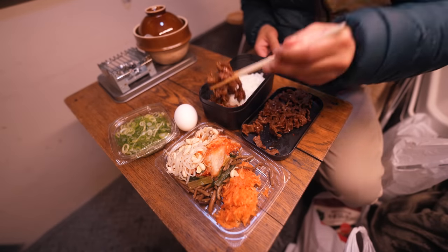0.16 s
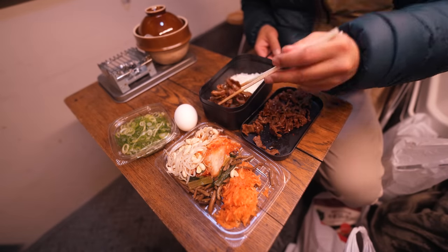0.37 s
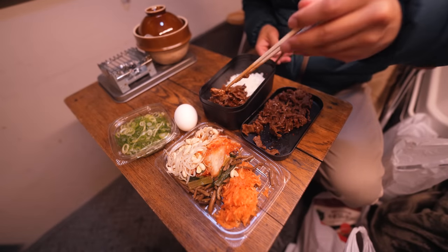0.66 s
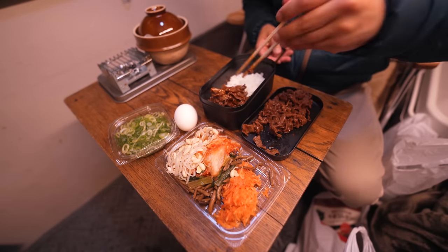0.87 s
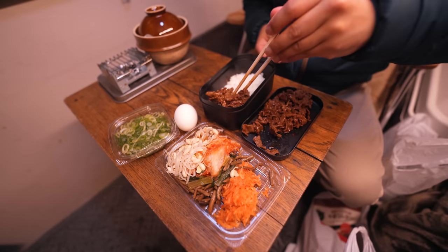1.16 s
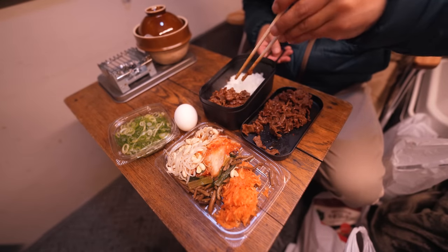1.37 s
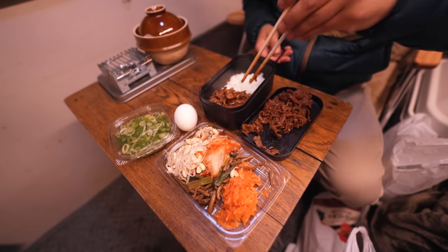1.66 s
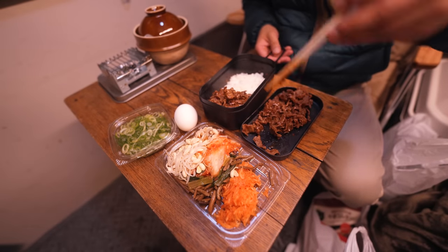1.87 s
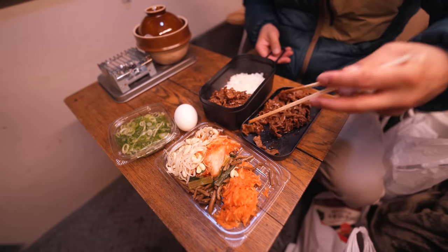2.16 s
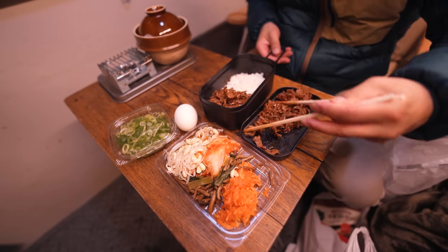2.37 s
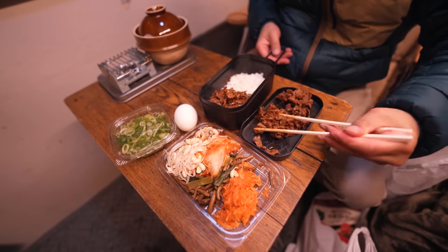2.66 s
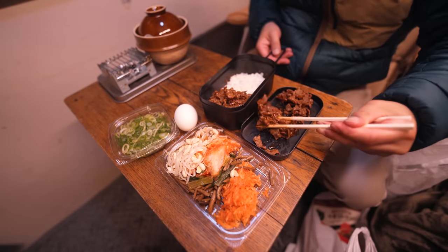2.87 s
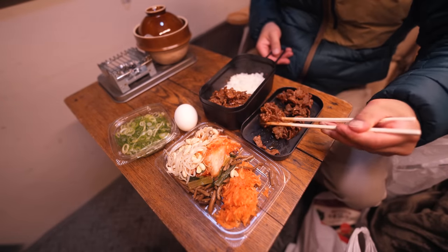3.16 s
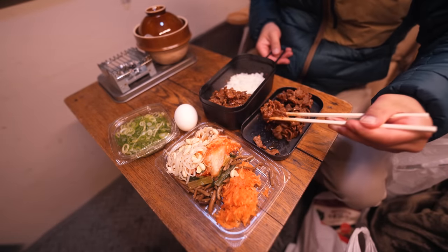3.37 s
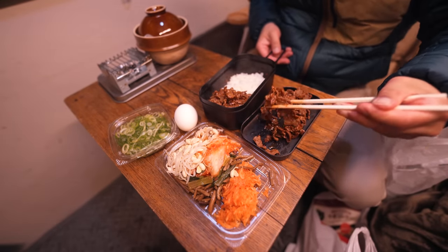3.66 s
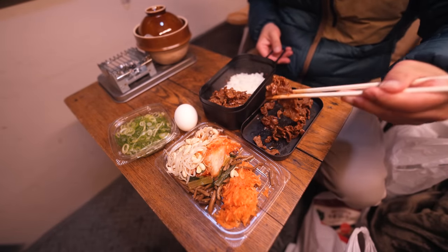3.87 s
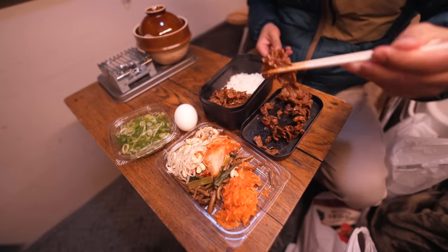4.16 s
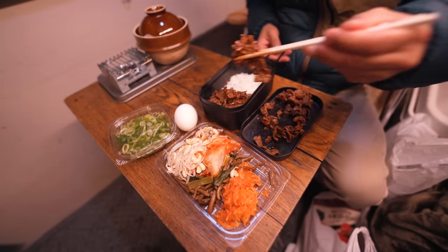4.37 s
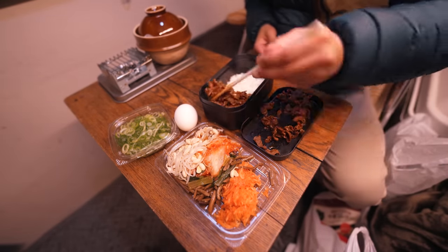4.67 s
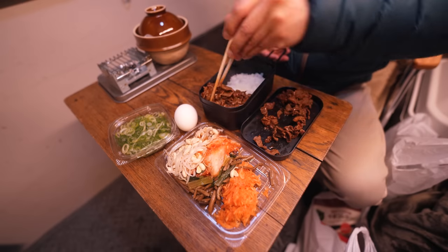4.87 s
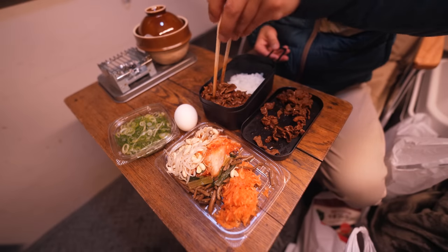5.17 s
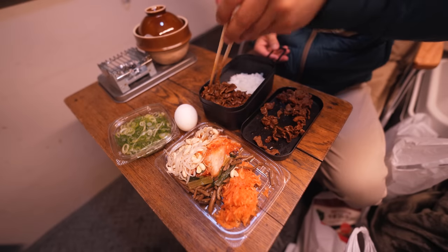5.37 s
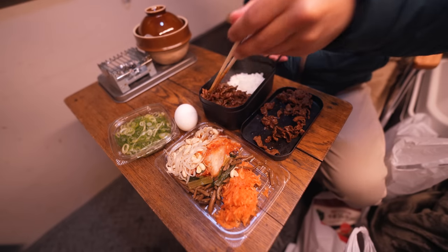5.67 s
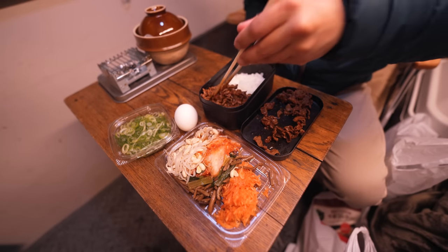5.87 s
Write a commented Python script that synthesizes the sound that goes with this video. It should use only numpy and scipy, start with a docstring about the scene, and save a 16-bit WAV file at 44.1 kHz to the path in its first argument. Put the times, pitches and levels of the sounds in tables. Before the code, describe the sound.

Close, quiet meal sounds: nylon sleeve swishes, chopstick clicks, a raspy tray scrape, tiny moist ticks and a hard crockery clunk in a small cabin.

```python
"""A faint hum and hiss in a quiet parked car, then small sounds of a meal at a wooden table.
A padded jacket shuffles and swishes (flickering friction noise); a plastic tray bumps and crockery knocks (struck modes).
Thin high ticks, most perhaps from moist food, one a loud hard snap, and chopstick clicks are cracks with brief rings;
chopsticks scrape the tray (noise through wavering resonances).
The small cabin adds dense reflections to the contacts and friction; the sound is mono."""
import sys
import numpy as np
from scipy import signal
from scipy.fft import rfft, irfft
from scipy.io import wavfile
from scipy.ndimage import uniform_filter1d

SR = 44100
rng = np.random.default_rng(int(sys.argv[2]) if len(sys.argv) > 2 else 0)


def inscribe(sig):
    """Save sig as 16-bit PCM at rate SR to the path in sys.argv[1].

    A 1-D sig is mono; a 2-D sig holds one channel per row.
    Samples are clipped to [-1, 1] before scaling.
    """
    pcm = np.round(np.clip(np.atleast_2d(sig).T, -1, 1) * 32767)
    wavfile.write(sys.argv[1], SR, pcm.astype(np.int16))


N = 265041
TIME = np.arange(N) / SR
RING_TIME = TIME[:SR // 4]   # a quarter second, for single contacts and echoes

# crockery blows, a first touch, the full blow and a faint rattle: start_s, level_db, contact_brightness_hz
KNOCKS = [(1.5850, -44, 7000), (1.5855, -21.5, 3200), (1.6055, -39.5, 5000), (1.6252, -50, 3000)]


def from_db(db):
    """Decibels to gain."""
    return 10 ** (np.asarray(db) / 20)


def rms_one(x):
    """Scale to unit power."""
    return x / np.sqrt(np.mean(x ** 2) + 1e-20)


def coloured(x, colour):
    """Shape the spectrum by (hz, db) points, straight in log frequency; unit power."""
    hz, db = np.transpose(colour)
    bins_hz = np.maximum(np.fft.rfftfreq(N, 1 / SR), 1)
    gain = from_db(np.interp(np.log(bins_hz), np.log(hz), db))
    return rms_one(irfft(rfft(x) * gain, N))


def cut(x, hz, kind, order=2):
    """Causal low- or high-pass."""
    return signal.sosfilt(signal.butter(order, min(hz, .45 * SR), kind, fs=SR, output="sos"), x)


def resonate(x, hz, width_hz):
    """One resonance, of gain 1 at its top."""
    return signal.lfilter(*signal.iirpeak(hz, hz / width_hz, fs=SR), x)


def drift(hz):
    """Random wander of unit power, slower than hz."""
    return rms_one(cut(rng.standard_normal(N), hz, "low"))


def add(track, start_s, sound):
    """Mix a sound into the track at a time."""
    start = min(round(start_s * SR), N - 1)
    track[start:start + len(sound)] += sound[:N - start]


def together(gains):
    """Overlapping movements add in power."""
    return np.sqrt(sum(gain ** 2 for gain in gains))


def swell(top_s, half_s):
    """A movement gathers speed and slows again: a rounded top with flanks straight in dB."""
    flank_db = 9.5   # final slope, per half-length
    return from_db(-flank_db * (np.hypot(1, (TIME - top_s) / half_s) - 1))


def stroke(start_s, length_s, attack_s, release_s, rise_db_per_s=0):
    """Attack, a hold that may grow to full level, release; attack and release times are per 20 dB."""
    early_s = np.maximum(start_s - TIME, 0)
    late_s = np.maximum(TIME - start_s - length_s, 0)
    to_go_s = np.clip(start_s + length_s - TIME, 0, length_s)
    return from_db(-20 * (early_s / attack_s + late_s / release_s) - rise_db_per_s * to_go_s)


def cabin(x, wet_db, low_hz=500, even_hz=800):
    """Direct sound plus dense reflections from table, windows and walls: a fine comb, even in overall colour."""
    cabin_t60_s = 0.17
    near_t60_s, near_db = 0.051, 15   # box walls and table top answer first and briefly
    t = RING_TIME
    fade = from_db(-60 * t / cabin_t60_s) + from_db(near_db - 60 * t / near_t60_s)
    echoes = rng.standard_normal(len(t)) * fade * (t > .0004)
    echoes = cut(echoes / np.linalg.norm(echoes), low_hz, "high")
    paths = rfft(signal.unit_impulse(len(t)) + from_db(wet_db) * echoes, SR)   # bins 1 Hz apart
    smooth_power = uniform_filter1d(np.abs(paths) ** 2, max(int(even_hz), 1))
    response = irfft(paths / np.sqrt(smooth_power), SR)[:len(t)]
    return np.hypot(1, from_db(wet_db)) * signal.fftconvolve(x, response)[:len(x)]


def ring(hz, t60_s):
    """A struck mode: a sine that dies exponentially."""
    return np.sin(2 * np.pi * hz * RING_TIME) * from_db(-60 * RING_TIME / t60_s)


def crack(low_hz, high_hz):
    """The brief broadband pulse of a contact, of height 1."""
    pulse = cut(signal.unit_impulse(SR // 4), low_hz, "high", order=4)
    pulse = cut(pulse, high_hz, "low", order=1)
    return pulse / np.abs(pulse).max()


def struck(blows, modes, wet_db, crack_db, crack_low_hz, crack_wet_db):
    """Every blow cracks and rings the same body; a softer contact has less treble."""
    body = sum((-1) ** k * from_db(db) * ring(hz, t60_s) for k, (hz, db, t60_s) in enumerate(modes))
    out = np.zeros(N)
    for start_s, level_db, contact_hz in blows:
        clack = from_db(crack_db) * cabin(crack(crack_low_hz, contact_hz), crack_wet_db)
        blow = cabin(body, wet_db, low_hz=1070) + clack
        add(out, start_s, from_db(level_db) * cut(blow, contact_hz, "low", order=1))
    return out


def snap(modes, cycles, crack_db, crack_low_hz, crack_high_hz, wet_db, crack_wet_db):
    """A small contact: a crack and a brief ring at its (hz, db) modes, down 60 dB after the given cycles."""
    tone = sum(from_db(db) * ring(hz, cycles / hz) for hz, db in modes)
    lowest_hz = min(hz for hz, db in modes)
    tone = cut(tone, 0.8 * lowest_hz, "high", order=4)   # small things radiate little bass
    edge = from_db(crack_db) * crack(crack_low_hz, crack_high_hz)
    return cabin(tone, wet_db) + cabin(edge, crack_wet_db)


def friction(colour, slips_per_s, flutter_db, wet_db, even_hz=600):
    """Surfaces catch and slip thousands of times a second, under a wavering pressure; unit power."""
    slips = rng.standard_normal(N) * (rng.random(N) < slips_per_s / SR)
    pressure = from_db(flutter_db * drift(41.7))
    return coloured(cabin(slips * pressure, wet_db, even_hz=even_hz), colour)


def hush():
    """Filtered noise: faint cabin hum and hiss, and a deep seat rumble that swells as weight shifts."""
    # weight shifts: top_s, level_db
    shifts = [(.34, -70), (2.42, -69.5), (3.04, -82), (4.84, -73), (5.33, -70), (5.991, -65)]
    # rumble spectrum: frequency_hz, density_db
    sway_colour = [(15, -8), (42, -6.5), (70, -12), (130, -10), (400, -49), (2000, -78)]
    # hum and hiss spectrum: frequency_hz, density_db
    hush_colour = [(12, -52.5), (20, -22), (104, -0.5), (163, -9), (204, -5), (241, -7), (285, -0.4),
                   (357, -6.5), (388, -3.5), (527, -6.5), (642, -10), (923, -16.5), (1220, -16),
                   (1610, -21), (7000, -20.5), (15000, -19.5)]
    shifting = together(from_db(db) * swell(top_s, half_s=0.11) for top_s, db in shifts)
    sway = shifting * coloured(rng.standard_normal(N), sway_colour)
    return sway + from_db(-62) * coloured(rng.standard_normal(N), hush_colour)


def jacket():
    """Each reach shuffles the padding and slides the nylon; where the sleeve brushes, it hisses and zips."""
    # arm movements: top_speed_s, half_length_s, padding_db, nylon_db
    reaches = [(0.193, 0.12, -60, -60.5), (0.588, 0.11, -65, -65), (0.97, 0.068, -67, -69),
               (1.763, 0.18, -65.5, -66), (2.142, 0.1, -57.5, -59), (2.41, 0.1, -56, -64.5),
               (2.912, 0.17, -59.5, -69), (3.23, 0.077, -87, -87), (4.62, 0.17, -61.5, -61.5),
               (5.035, .14, -56.5, -48.5), (5.303, 0.088, -57.5, -62.5), (5.583, 0.22, -67, -67),
               (5.985, 0.065, -63.5, -69)]
    # sleeve against jacket: start_s, length_s, hiss_db, weave_zip_db
    swishes = [(2.349, 0.017, -51, -74), (2.464, 0.09, -46, -45), (2.595, 0.042, -49, -71),
               (2.675, 0.079, -57.5, -73), (2.917, 0.025, -51.5, -54), (4.834, 0.11, -57, -44.5),
               (4.994, 0.19, -66, -47.5)]
    # nylon spectrum: frequency_hz, density_db
    slide_colour = [(150, -34.5), (400, -2.5), (1000, -5), (2000, -2.5), (4000, -2.5), (7000, -2.5),
                    (10000, -3.5), (14000, -4.5), (16000, -4.5)]
    # weave spectrum: frequency_hz, density_db
    zip_colour = [(1000, -46), (9000, -15), (11500, -9), (13300, -6), (15500, -3.5)]
    # padding spectrum: frequency_hz, density_db
    shuffle_colour = [(100, -15), (350, 7), (600, 2.5), (1000, 2.5), (1600, -2), (2500, -4), (4000, -9),
                      (8000, -37), (16000, -67.5)]
    padding, nylon, zipping = [], [], []
    for top_s, half_s, padding_db, nylon_db in reaches:
        speed = swell(top_s, half_s)
        padding.append(from_db(padding_db) * speed)
        nylon.append(from_db(nylon_db) * speed)
    for start_s, length_s, hiss_db, zip_db in swishes:
        release_s = 0.033 + 0.43 * length_s   # a longer swish dies more slowly
        contact = stroke(start_s, length_s, 0.037, release_s)
        nylon.append(from_db(hiss_db) * contact)
        zipping.append(from_db(zip_db) * contact)
    slide = together(nylon) * friction(slide_colour, slips_per_s=20000, flutter_db=0.6, wet_db=-9.5)
    weave = together(zipping) * coloured(rng.standard_normal(N), zip_colour)
    shuffle = together(padding) * friction(shuffle_colour, slips_per_s=2500, flutter_db=1.0, wet_db=-3.0)
    return slide + weave + shuffle


def tray():
    """The plastic tray bumps on the table: a crack and short modes, duller for softer contacts."""
    # bumps: start_s, level_db, contact_brightness_hz
    bumps = [(.114, -58, 2500), (.141, -59.5, 1500), (.916, -61, 1190), (.947, -58, 2000),
             (2.010, -57.5, 900), (2.043, -61.5, 3000), (2.420, -71, 2000), (2.843, -56, 1200),
             (2.9735, -50.5, 5000), (3.013, -57, 1000), (3.0622, -37.5, 1620), (3.0755, -47, 1200),
             (3.1915, -59, 1690), (3.238, -64, 990), (3.259, -64.5, 1400), (3.365, -66, 2000),
             (3.494, -65.5, 1500), (3.775, -60, 1210), (4.499, -59, 1500), (4.630, -58, 1200),
             (5.962, -61.5, 2500)]
    # tray modes: frequency_hz, level_db, t60_s
    tray_modes = [(128, -30, 0.39), (213, -18, 0.19), (377, -12, 0.12), (435, 4.5, 0.048),
                  (540, -0.5, 0.057), (730, -2, 0.036), (879, 0, 0.058), (973, -18, 0.084),
                  (1485, -13, 0.034), (2370, -2.5, 0.023), (3570, 1.5, 0.013), (4800, -5, 0.0086)]
    return struck(bumps, tray_modes, wet_db=3, crack_db=3.5, crack_low_hz=408, crack_wet_db=12.0)


def thin_ticks():
    """Thin, high ticks, most perhaps from moist food, and one loud, hard snap at 4.556 s: a crack and one mode."""
    # ticks: start_s, level_db, pitch_hz, ring_cycles, crack_db
    ticks = [ (.1382, -28.5, 11800, 22, -14), (.3028, -47, 14300, 40, -12), (0.4086, -37.5, 13500, 35, -7),
             (.426, -45, 14200, 38, -12), (0.6086, -50.5, 11000, 50, -14), (0.723, -49.5, 10200, 35, -4),
             (1.4437, -46.5, 13700, 28, -15), (3.5125, -46, 13200, 28, -12), (3.65, -42.5, 12000, 46, 5),
             (4.5556, -18, 14100, 43, -7), (4.5559, -31.5, 4540, 13, -30), (4.5558, -19, 8920, 22, -4.5),
             (5.348, -46, 10500, 15, -6), (5.5125, -46, 14000, 33, -21), (5.538, -49, 13500, 36, -16),
             (5.573, -44.5, 9500, 23, -1), (5.6008, -50.5, 8100, 40, 2), (5.627, -47, 13500, 34, -12),
             (5.702, -35, 14800, 60, -19), (5.8877, -46, 7200, 26, -14)]
    out = np.zeros(N)
    for start_s, level_db, hz, cycles, crack_db in ticks:
        # the higher the pitch, the higher the crack starts
        tick = snap([(hz, 0)], cycles, crack_db, crack_low_hz=0.29 * hz, crack_high_hz=14300,
                    wet_db=4.5, crack_wet_db=3.0)
        add(out, start_s, from_db(level_db) * tick)
    return out


def chopsticks():
    """Wooden tips click on box and tray: two modes whose pitch depends on the spot, with the same damping."""
    # clicks: start_s, level_db, pitch_hz, second_mode_hz, second_mode_db, crack_db, crack_low_hz
    clicks = [ (0.1383, -25, 3540, 5040, 2.5, -2.5, 1700), (0.141, -40.5, 1670, 6800, 15, 14.5, 790),
              (.343, -52, 4530, 3700, -15, -8, 3000), (0.948, -55, 1520, 3100, -9, 7, 800),
              (2.2980, -39.5, 2300, 4530, -5, 3, 1200), (2.3025, -34, 2310, 870, -10, -8, 1300),
              (2.3386, -33.5, 2330, 1780, -2.5, -5, 1200), (2.4107, -38.5, 915, 2110, 1, -0.5, 560),
              (2.4195, -41, 844, 713, 4, -18, 520), (2.9734, -45.5, 1490, 2000, 2, 11, 850),
              (3.0025, -40, 2600, 3270, -1, -8, 2000), (3.0622, -36, 2060, 4440, 3, -11, 2200),
              (3.1927, -55, 990, 2960, -7, -2, 700), (3.7516, -42, 1640, 3260, 3.5, -0.5, 1110),
              (5.7225, -45, 2310, 790, -4, -10, 1390), (5.9800, -37, 2220, 3500, -4, -11, 1490),
              (5.9831, -26.5, 1830, 2630, 2, -6, 1500), (5.9830, -29.5, 3650, 4800, 0, -10, 4500),
              (5.9832, -32.5, 6250, 7000, 0, -8, 5000)]
    out = np.zeros(N)
    for start_s, level_db, hz, second_hz, second_db, crack_db, low_hz in clicks:
        modes = [(hz, 0), (second_hz, second_db)]
        click = snap(modes, 20.3, crack_db, low_hz, crack_high_hz=4260, wet_db=-0.5, crack_wet_db=4.5)
        add(out, start_s, from_db(level_db) * click)
    return out


def crockery():
    """A hard knock rings the crockery's many modes, then fine chatter follows."""
    # crockery modes, the last three very short for the clack: frequency_hz, level_db, t60_s
    crockery_modes = [(208, -38, 0.31), (343, -23, 0.09), (493, -9.5, 0.054), (595, -10, 0.11),
                      (760, -6.5, 0.061), (830, -1, 0.068), (887, 2, 0.029), (1050, 1, 0.067),
                      (1217, -15, .06), (1322, 1.5, 0.053), (1410, -0.5, 0.049), (1474, -4.5, 0.085),
                      (1540, -15, 0.17), (1730, -9, 0.039), (1835, -15, 0.07), (2066, -6.5, 0.064),
                      (2190, -4, .04), (2325, -1, 0.047), (2444, -2.5, 0.027), (2756, -15.5, 0.05),
                      (3020, -10, 0.04), (3480, -14, 0.064), (3860, -21, 0.07), (4200, -16, 0.075),
                      (4260, -18.5, .06), (5460, -25, .08), (1130, 3.5, 0.013), (2370, 0.5, 0.016),
                      (4100, -6, 0.013)]
    knock = struck(KNOCKS, crockery_modes, wet_db=-8, crack_db=-14, crack_low_hz=595, crack_wet_db=-1)
    return knock + chatter(start_db=-36.5, t60_s=0.16)


def chatter(start_db, t60_s):
    """Tiny contacts follow the main blow and die away as the crockery settles."""
    # chatter spectrum: frequency_hz, density_db
    chatter_colour = [(300, -26), (900, 9), (1500, 9), (2500, 2), (4200, 4), (5500, -6), (6700, -5),
                      (8200, -19), (10500, -11), (15000, -22)]
    since_s = TIME - KNOCKS[1][0]
    fade = (since_s > 0) * from_db(start_db - 60 * np.abs(since_s) / t60_s)
    return fade * friction(chatter_colour, slips_per_s=2500, flutter_db=1.5, wet_db=-1.0)


def scrape():
    """Wood sticks and slips on thin plastic; tray resonances waver, and each stroke has its own note."""
    # strokes: start_s, length_s, end_level_db, tip_note_hz, tip_note_db
    strokes = [(2.356, 0.022, -53.5, 6000, 2), (2.462, 0.096, -46.5, 6900, 17),
               (2.597, 0.057, -56, 6380, 19), (2.7, 0.065, -47.5, 4650, 10), (2.811, 0.13, -42.5, 4300, -1),
               (3.032, 0.013, -55, 4660, -5), (3.104, 0.022, -64.5, 3000, 0)]
    # tray resonances: frequency_hz, width_hz, mean_level_db
    scrape_peaks = [(1400, 48, 14.5), (1535, 30, 7.5), (2465, 90, 4.5), (2650, 50, 10), (3680, 69, 11),
                    (4840, 140, 10), (5090, 90, 4), (5930, 90, -2), (7300, 110, 6), (7630, 100, 4)]
    # rasp spectrum: frequency_hz, density_db
    rub_colour = [(300, -40), (1000, -28), (1500, -4.5), (2000, -3.5), (2700, 2), (3700, 1.5), (5000, 2.5),
                  (6500, 0), (8000, -6.5), (11000, -10.5), (16000, -15)]
    waver_db, waver_hz = 3.5, 11.6
    rasp = friction(rub_colour, slips_per_s=3000, flutter_db=0.5, wet_db=2.5, even_hz=1100)
    gritty = rasp + from_db(-1) * catches()
    for hz, width_hz, db in scrape_peaks:
        gritty = gritty + from_db(db + waver_db * drift(waver_hz)) * resonate(rasp, hz, width_hz)
    out = squeak(width_hz=320)
    for start_s, length_s, end_db, tip_hz, tip_db in strokes:
        # the tips bear down harder as a stroke goes on
        press = stroke(start_s, length_s, attack_s=0.062, release_s=0.03, rise_db_per_s=47)
        tip_note = from_db(tip_db) * resonate(rasp, tip_hz, width_hz=220)
        out = out + from_db(end_db) * press * rms_one(gritty + tip_note)
    return out


def catches(per_s=260, spread_db=1.5, t60_s=0.044):
    """The tip catches on ridges and scraps of food; each catch pings at its own pitch. Unit power."""
    low_hz, high_hz = 2997, 6730
    out = np.zeros(N)
    for when, place, size in rng.random((int(per_s * N / SR), 3)):
        hz = low_hz * (high_hz / low_hz) ** place
        level_db = -spread_db * np.log(max(size, .05))
        add(out, when * N / SR, from_db(level_db) * ring(hz, t60_s))
    return rms_one(cabin(out, wet_db=3))


def squeak(width_hz):
    """Nearly regular slips of a tip: a sine gliding mostly down, roughened to a narrow band by random gain."""
    # squeak contour: time_s, pitch_hz, level_db
    squeak_path = [(2.68, 5200, -72), (2.714, 5250, -55), (2.749, 4830, -45), (2.768, 4120, -61),
                   (2.80, 3670, -66)]
    s, hz, db = np.transpose(squeak_path)
    phase = 2 * np.pi * np.cumsum(np.interp(TIME, s, hz)) / SR
    tone = rms_one(drift(width_hz) * np.sin(phase))
    return tone * from_db(np.interp(TIME, s, db, left=-np.inf, right=-np.inf))


def scene():
    """All sources, the same in both ears."""
    mono = hush() + jacket() + tray() + thin_ticks() + chopsticks() + crockery() + scrape()
    return np.tile(mono, (2, 1))


def record(dry):
    """A steep elliptic low-pass cuts the top."""
    cutoff_hz = 15750
    return signal.sosfilt(signal.ellip(10, .2, 70, cutoff_hz, fs=SR, output="sos"), dry)


dry = scene()
out = record(dry)
inscribe(out)
```